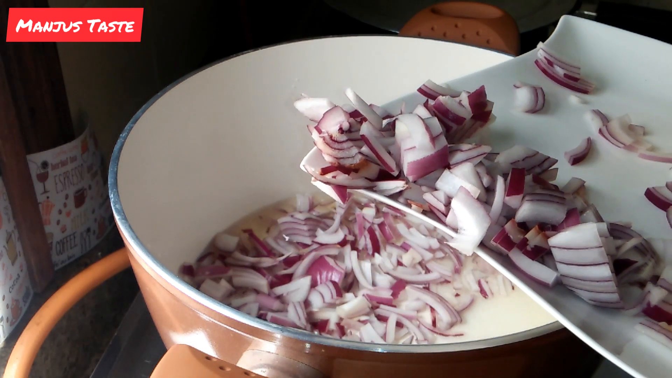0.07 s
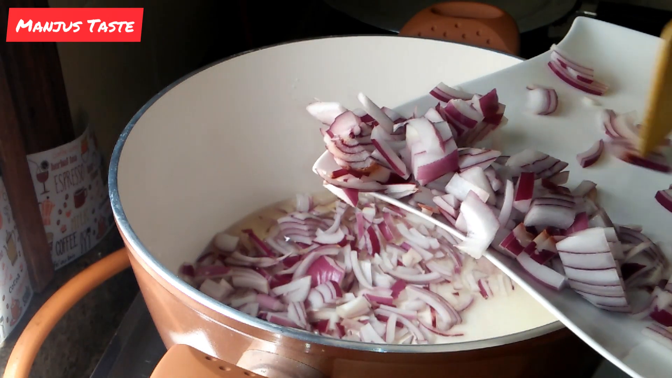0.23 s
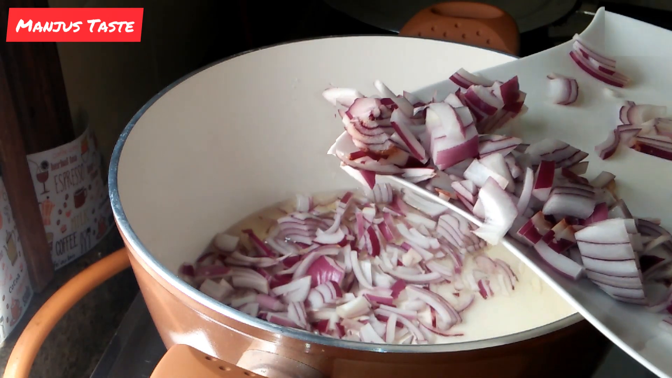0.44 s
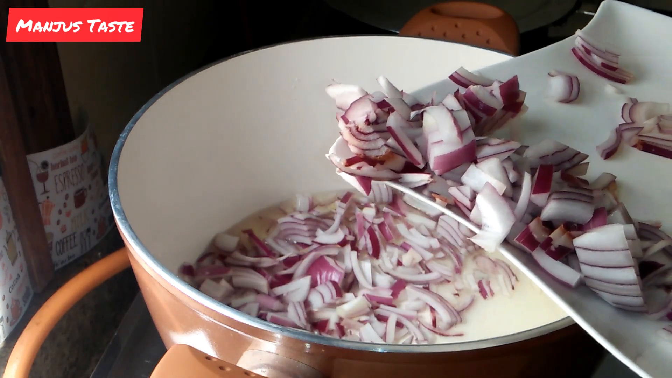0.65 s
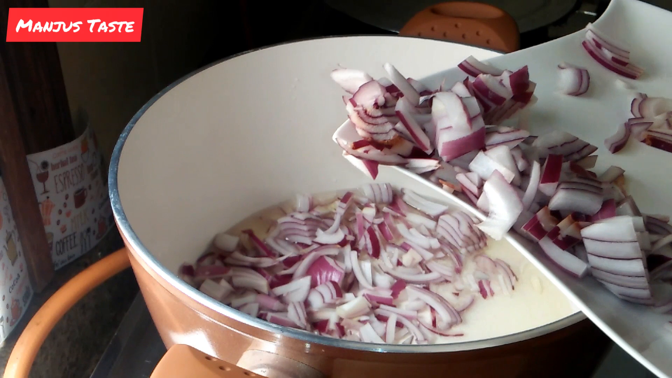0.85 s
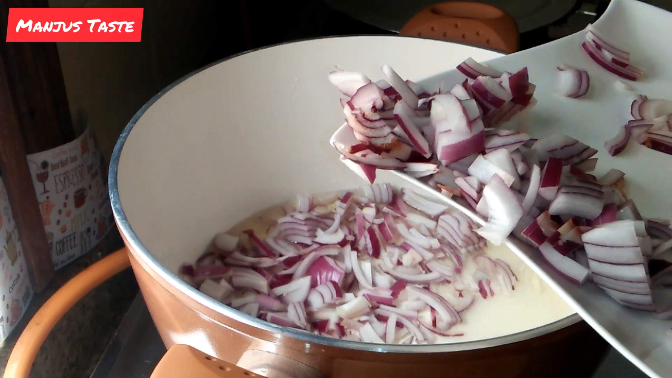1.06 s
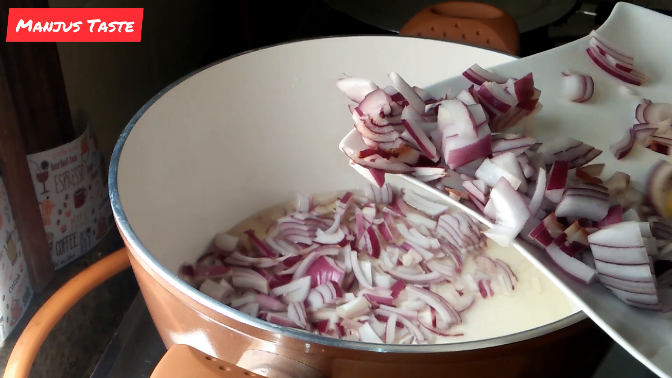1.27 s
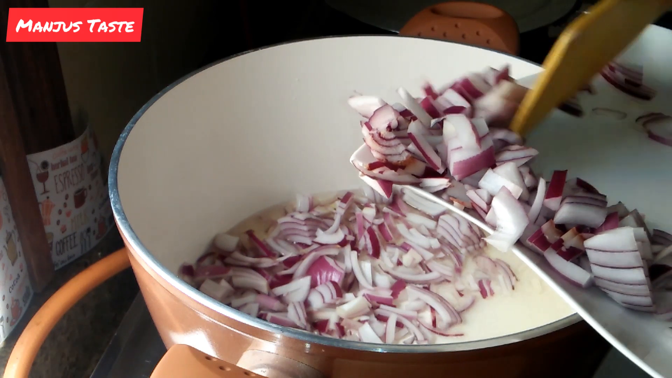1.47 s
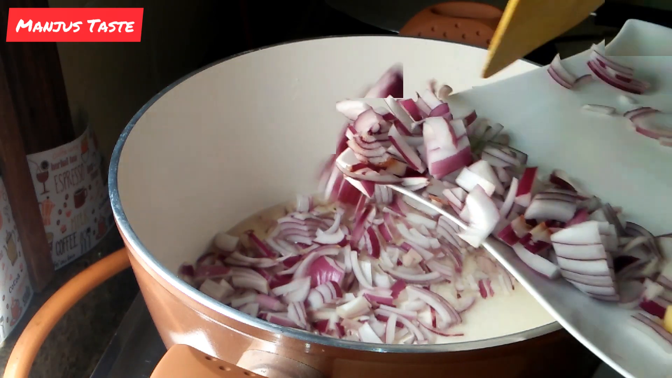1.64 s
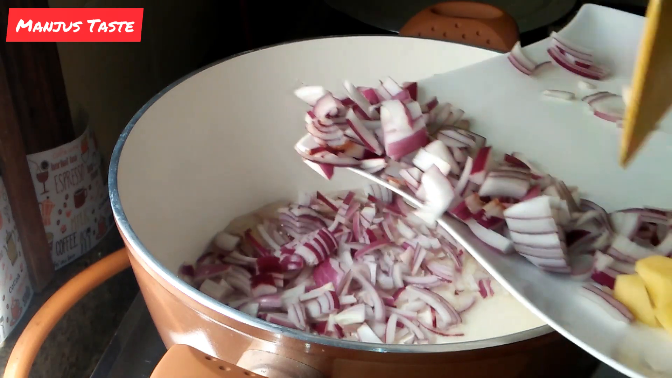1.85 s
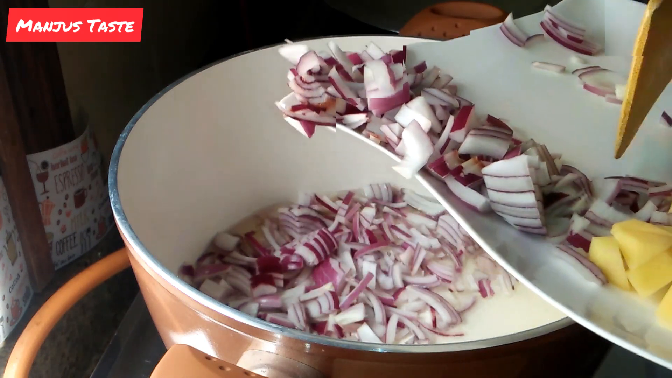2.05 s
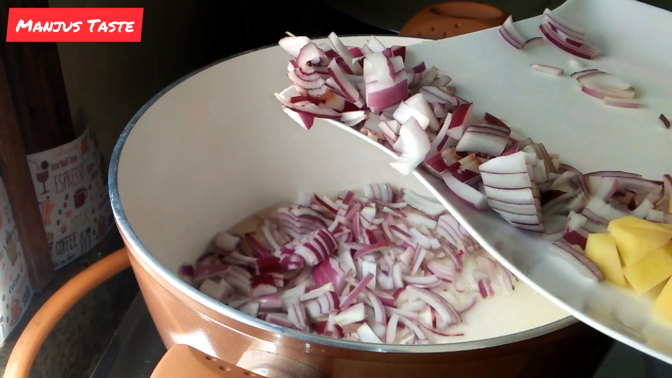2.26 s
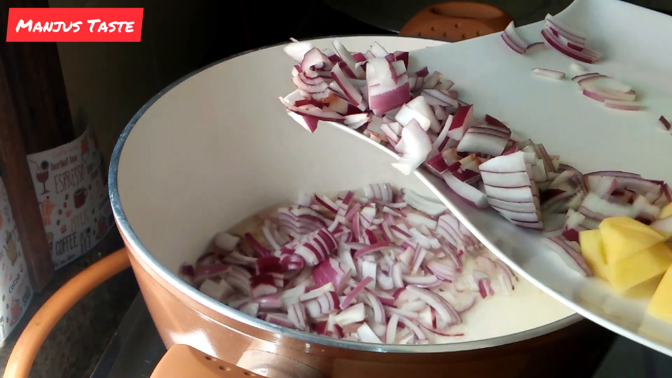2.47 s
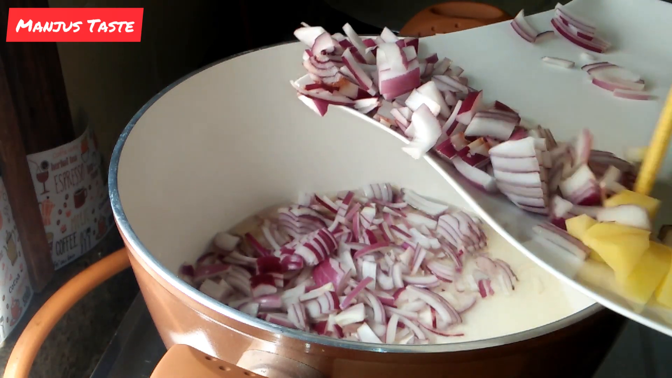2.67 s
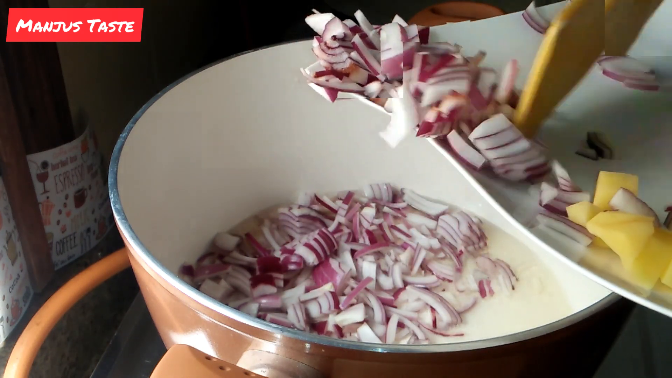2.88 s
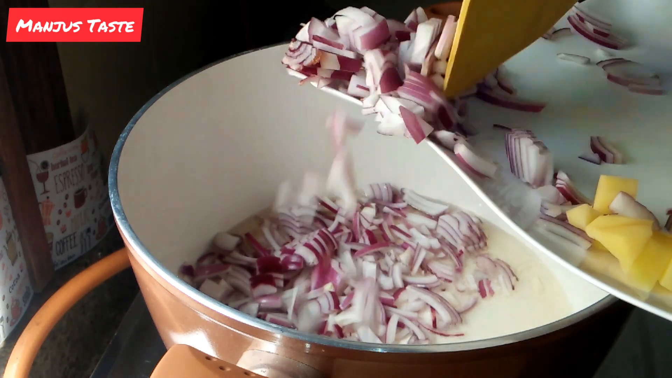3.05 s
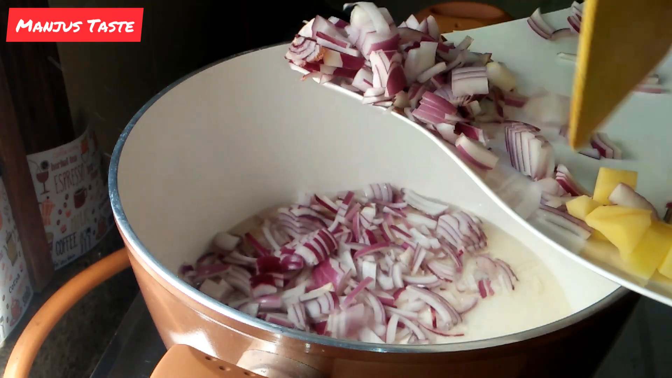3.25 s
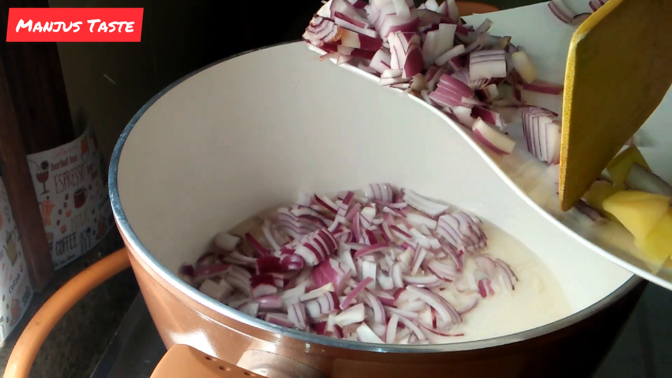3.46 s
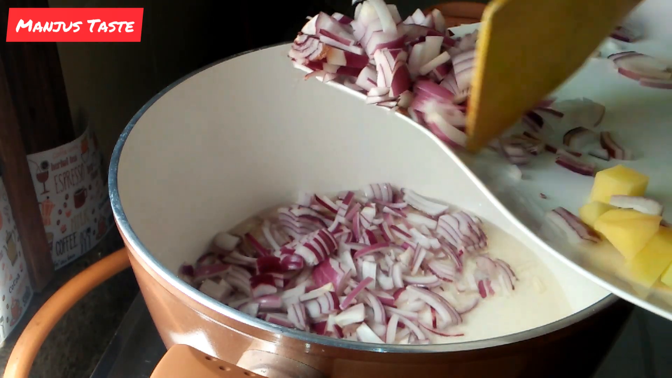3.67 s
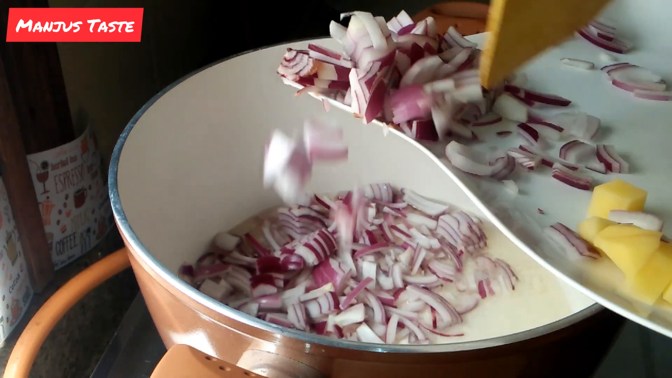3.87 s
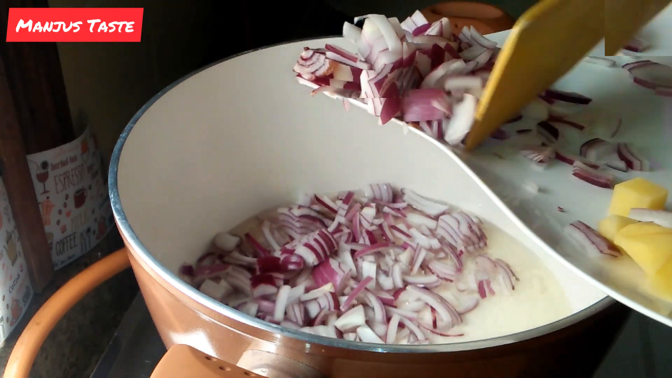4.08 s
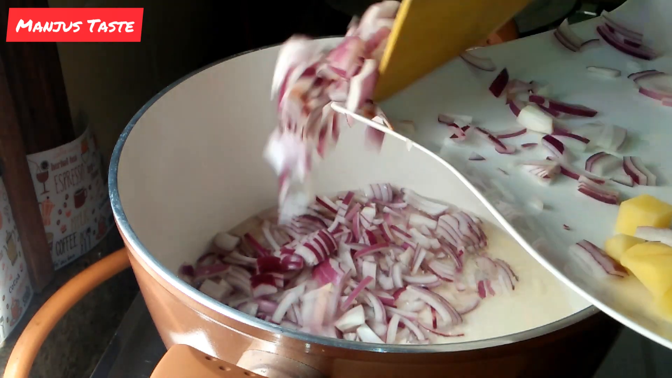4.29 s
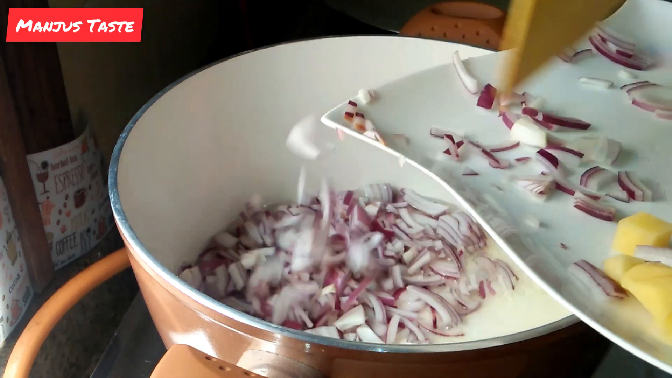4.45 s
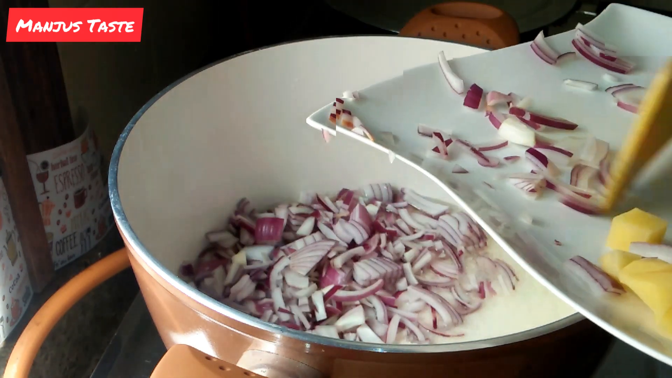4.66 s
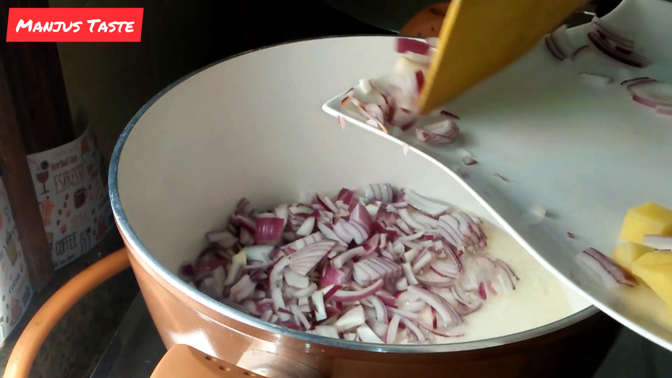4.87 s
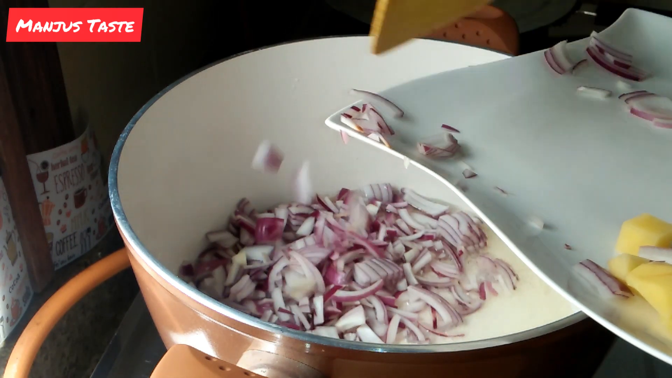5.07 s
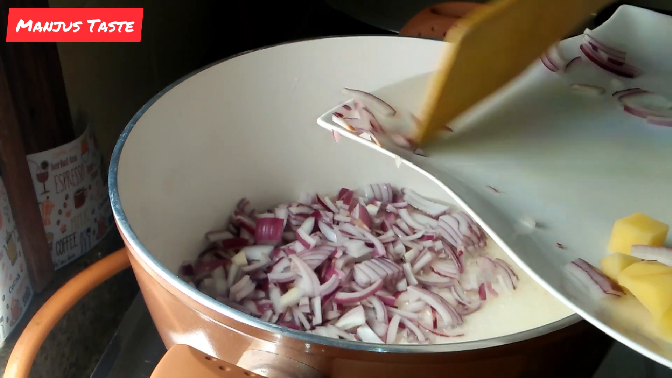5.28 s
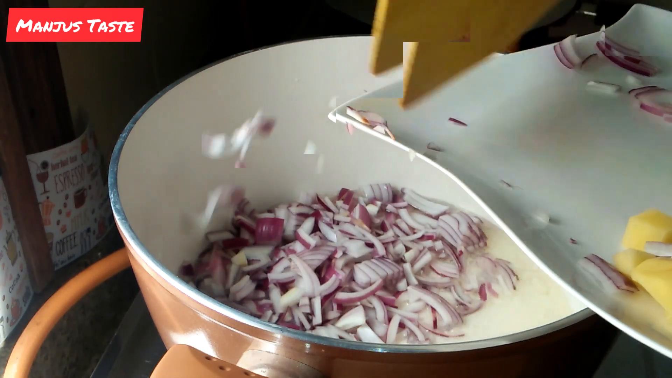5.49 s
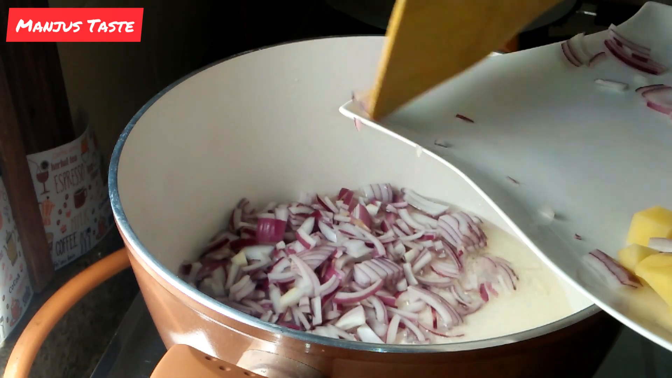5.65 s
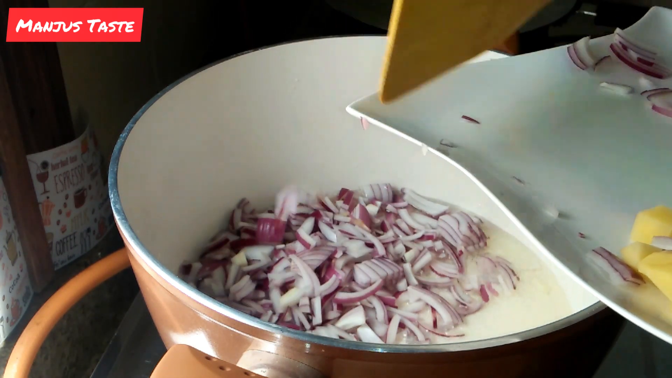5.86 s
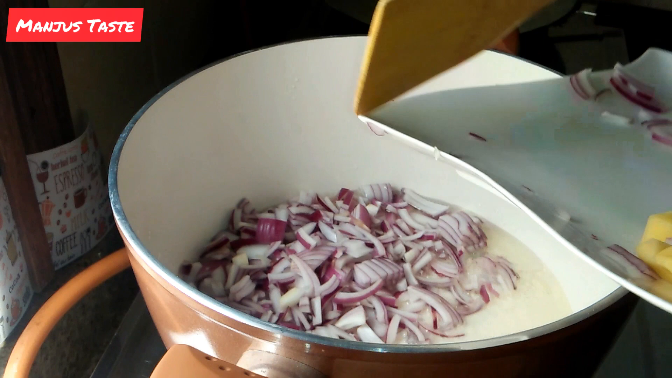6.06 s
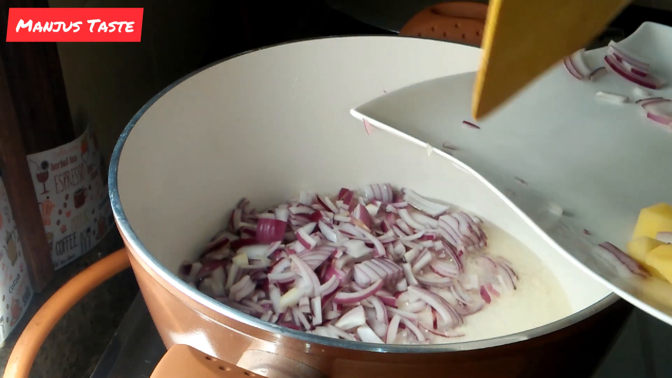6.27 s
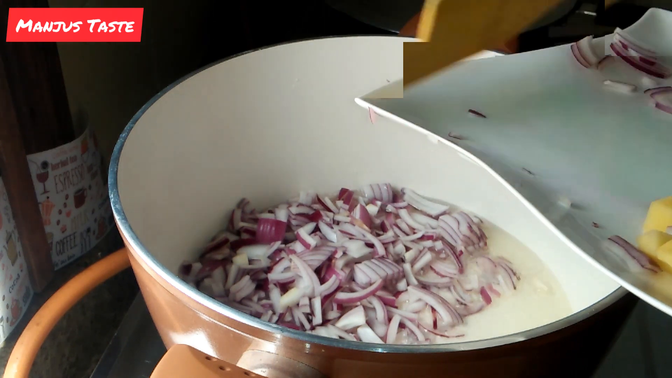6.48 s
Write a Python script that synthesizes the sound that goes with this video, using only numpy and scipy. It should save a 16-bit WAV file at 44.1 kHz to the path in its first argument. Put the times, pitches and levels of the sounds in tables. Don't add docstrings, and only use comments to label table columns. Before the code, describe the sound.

Frying oil flares and spits first, with a low flame rumble beneath. A hard wooden knock on a glazed plate follows, then a few onion pieces land softly in the pot. Lighter taps, dry scrapes and tiny bubble ticks continue until a thicker tumble of pieces and closer-spaced knocks. A close stereo microphone catches short, bright kitchen reflections; the treble fizz spreads wide while the knocks stay central.

```python
import sys
import numpy as np
from scipy import signal
from scipy.fft import rfft, irfft, next_fast_len
from scipy.io import wavfile
from scipy.ndimage import uniform_filter1d

SR = 44100
rng = np.random.default_rng(int(sys.argv[2]) if len(sys.argv) > 2 else 0)


def file_out(sig):
    cols = np.atleast_2d(sig).T
    lim = np.clip(cols, -1, 1)
    pcm = np.round(lim * 32767).astype(np.int16)
    wavfile.write(sys.argv[1], SR, pcm)


def elevation(decibels):
    levels = np.asarray(decibels, float)
    return 10 ** (levels / 20)


N = 287701


def unit(x):
    return x / np.sqrt(np.mean(x ** 2) + 1e-20)


def along(points, hz):
    f, v = np.transpose(points)
    return np.interp(np.log(hz + 1), np.log(f + 1), v)


def filtered(x, points):
    size = next_fast_len(x.shape[-1] + SR // 4)
    gain = elevation(along(points, np.fft.rfftfreq(size, 1 / SR)))
    return irfft(rfft(x, size) * gain, size)[..., :x.shape[-1]]


def rush(spectrum, patchy_db, bins, frames):
    z = signal.stft(rng.standard_normal((2, N)), nperseg=512)[2]
    field = uniform_filter1d(rng.standard_normal(z.shape[1:]), bins, 0)
    field = uniform_filter1d(field, frames, 1)
    noise = signal.istft(z * elevation(patchy_db * unit(field)), nperseg=512)[1][:, :N]
    return unit(filtered(noise, spectrum))


def crackle(spectrum, share, size_db, bins, fade_s):
    z = signal.stft(rng.standard_normal((2, N)), nperseg=256)[2]
    pops = (rng.random(z.shape[1:]) < share) * elevation(size_db * rng.exponential(size=z.shape[1:]))
    pops = bins * uniform_filter1d(pops, bins, 0)
    gain = 1 + signal.lfilter([1], [1, -np.exp(-128 / (fade_s * SR))], pops, axis=1)
    noise = signal.istft(z * gain, nperseg=256)[1][:, :N]
    return unit(filtered(noise, spectrum))


def swells(starts, holds, peak_db, rest_db, attack_s, release_db_per_s):
    knots = np.arange(0, N, 64)
    t = knots / SR - np.array(starts)[:, None]
    after_hold = np.clip(t - np.array(holds)[:, None], 0, None)
    shape = np.clip(t / attack_s, 0, 1) * elevation(-release_db_per_s * after_hold)
    power = elevation(2 * rest_db) + (elevation(peak_db) ** 2) @ shape ** 2
    return np.interp(np.arange(N), knots, np.sqrt(power))


def ring(hz, db, t60, rise):
    t = np.arange(SR // 8) / SR
    return elevation(db - 60 * t / t60) * (1 - np.exp(-t * hz / rise)) ** 2 * np.sin(2 * np.pi * hz * t)


# freq_hz, t60_s
KITCHEN = [(300, 0.51), (900, 0.34), (1400, 0.37), (2000, 0.39), (2800, 0.37), (5000, 0.27), (9000, 0.35),
           (14000, 0.15)]
# freq_hz, gain_db
BAND_EDGE = [(14240, 0), (14300, -40), (14500, -65)]


def kitchen_tail():
    clumps_db, clump_s = 1.2, 0.005
    near_gap, gap_s = 0.31, 0.011
    hz, t, z = signal.stft(rng.standard_normal((2, 3 * SR // 8)), SR, nperseg=256)
    decay_db = along(BAND_EDGE, hz + 60)[:, None] - 60 * t / along(KITCHEN, hz)[:, None]
    tail = signal.istft(z * elevation(decay_db), SR, nperseg=256)[1]
    late = np.arange(tail.shape[1]) / SR
    tail = tail * np.clip(late / 0.00064, 0, 1)
    tail = tail * (1 + 0.85 * np.exp(-((late - 0.039) / 0.003) ** 2))
    clumps = np.interp(late / clump_s, np.arange(200), rng.standard_normal(200))
    return tail * elevation(clumps_db * clumps) * (1 - near_gap * np.exp(-late / gap_s))


def add(out, s, sound, room_db, side_db):
    tail = kitchen_tail()
    wet = elevation(room_db) * signal.fftconvolve(sound[None], tail / np.linalg.norm(tail[0]), axes=1)
    wet[:, :len(sound)] += sound * [[1], [elevation(side_db)]]
    seat = out[:, round(s * SR):][:, :wet.shape[1]]
    seat += wet[:, :seat.shape[1]]


# freq_hz, density_db_per_hz
HOB = [(22, -21.5), (30, -18.5), (48, -16), (64, 3.5), (85, -11.5), (106, 1), (125, -14), (155, -19),
       (190, -13.5), (240, -43)]
# start_s, hold_s, level_db
GUSTS = [(-.03, 0.73, -70), (0.354, 0.57, -62), (0.75, 0.11, -55), (0.936, 0.044, -52), (1.295, 0.081, -59),
         (1.51, 0.33, -59), (1.959, 0.31, -55.5), (2.258, 0.14, -54.5), (2.573, 0.19, -55),
         (2.89, 0.083, -58), (3.29, 0.064, -55), (3.658, 0.068, -56.5), (3.955, 0.22, -63),
         (4.38, 0.045, -58), (4.495, 0.29, -62), (4.834, 0.079, -61), (5.02, 0.039, -61),
         (5.13, 0.14, -59.5), (5.503, 0.049, -59.5), (5.695, 0.18, -58.5), (5.964, 0.029, -52),
         (6.108, 0.066, -66)]


def burner():
    gain = swells(*np.transpose(GUSTS), rest_db=-66.5, attack_s=0.035, release_db_per_s=118)
    return gain * rush(HOB, patchy_db=2.5, bins=1, frames=4)


# freq_hz, density_db_per_hz
RUSTLE = [(900, -41.5), (1200, -2), (1700, -1.5), (2300, -4.5), (3200, -10.5), (4500, -21.5), (7000, -36.5)]
# freq_hz, density_db_per_hz
MURK = [(120, -23.5), (200, -14), (328, -3.5), (371, -16), (398, -6), (477, -1), (524, -20), (571, -1.5),
        (679, -11), (763, -1.5), (1140, -6), (1230, -12.5), (1300, -15.5), (1690, -54), (2860, -120)]
# start_s, hold_s, rustle_db, shove_over_rustle_db
DRAGS = [(-.03, 0.037, -62, -24), (0.384, 0.13, -80.5, 17), (1.333, 0.016, -65, 17.5),
         (1.483, 0.046, -56.5, -10), (1.67, 0.12, -71.5, 3), (2.451, 0.027, -66.5, 4),
         (2.706, 0.21, -67.5, 4), (2.965, 0.036, -69.5, 6.5), (3.263, 0.32, -67, 1), (4.178, 0.062, -67, 7),
         (4.52, 0.133, -61.5, 4.5), (4.751, 0.035, -59.5, -1), (4.837, 0.027, -61, -24),
         (5.082, 0.16, -69, -6), (5.925, 0.083, -66, 4.5), (6.107, 0.038, -48.5, -23)]


def drags():
    start, hold, rustle_db, over_db = np.transpose(DRAGS)
    attack_s, release_db_per_s = 0.0088, 133.5
    rustle = swells(start, hold, rustle_db, -71.5, attack_s, release_db_per_s)
    shove = swells(start, hold, rustle_db + over_db, -66.5, attack_s, release_db_per_s)
    out = rustle * rush(RUSTLE, patchy_db=4.0, bins=2, frames=8)
    return out + shove * rush(MURK, patchy_db=4.5, bins=1, frames=27)


# freq_hz, density_db_per_hz
FINE = [(2940, -50), (5000, -21), (5580, -10), (6950, -4.5), (8290, 1.5), (10100, 1), (11600, -1),
        (13700, -2), (14300, -13)]
# freq_hz, density_db_per_hz
COARSE = [(1060, -59), (1800, -29), (2030, -14.5), (2360, -22), (2760, -8), (4010, -4.5), (7000, -2.5),
          (9100, -23.5), (15400, -120)]
# start_s, hold_s, fine_db, coarse_below_fine_db
FLARES = [(-.05, 0.089, -48.5, 4), (0.102, 0.28, -53.5, 2), (0.667, 0.2, -60, 19), (1.047, 0.38, -61.5, 14),
          (1.655, .05, -67, 10), (1.702, 0.121, -58, 11.5), (2.007, 0.25, -57.5, 13.5),
          (2.4, 0.068, -64.5, 8), (2.873, 0.19, -58, 44), (3.267, 0.061, -60, 21), (3.347, 0.14, -59, 19.5),
          (3.741, 0.16, -66, 10), (4.006, 0.25, -61.5, 9), (4.483, 0.5, -58.5, 9.5),
          (5.162, 0.072, -65.5, 11), (5.314, 0.019, -58.5, 9), (5.832, 0.052, -70, 18),
          (5.947, 0.038, -66, -7.5), (6.11, 0.13, -59.5, 13), (6.414, 0.13, -60, 19.5)]


def frying():
    start, hold, fine_db, under_db = np.transpose(FLARES)
    attack_s, sink_db_per_s = 0.018, 47.5
    fine = swells(start, hold, fine_db, -82, attack_s, sink_db_per_s)
    coarse = swells(start, hold, fine_db - under_db, -81.5, attack_s, sink_db_per_s)
    oil = fine * crackle(FINE, share=0.0041, size_db=2.0, bins=15, fade_s=0.0091)
    oil += coarse * crackle(COARSE, share=0.0011, size_db=1.5, bins=7, fade_s=0.024)
    return filtered(oil, BAND_EDGE)


# pitch_hz, level_db, t60_s
POT = [(469, -5, 0.097), (594, -8, 0.12), (1003, 6, 0.049), (899, -16, 0.2), (1330, -1.5, 0.032),
       (1646, -3, 0.028), (2054, -10.5, 0.038)]
# start_s, level_db, low_hum_db
DROPS = [(1.8722, -44.5, -47), (1.878, -48.5, -36.5), (1.899, -61, -40), (2.191, -67, -58),
         (2.348, -58, -79.5), (2.516, -59, -83), (3.218, -56, -58), (3.256, -61, -49.5), (3.297, -67, -66),
         (3.424, -72, -52), (4.131, -59, -41.5), (4.17, -75, -49), (4.47, -56, -61), (4.479, -54, -61),
         (4.498, -62, -41), (4.507, -47, -56), (4.524, -62, -52), (4.551, -72, -45), (4.582, -48, -42.5),
         (4.6, -48.5, -64), (4.634, -54, -44.5), (4.651, -73, -82), (4.663, -75, -58), (4.699, -62, -48),
         (5.272, -63, -48.5), (5.332, -74, -56)]


def drops():
    out = np.zeros((2, N))
    for s, db, hum_db in DROPS:
        wall = 0
        for hz, mode_db, t60 in POT:
            landing_db = hum_db if hz < 700 else db
            wall = wall + ring(hz, landing_db + mode_db + 0.5 + rng.normal(0, 0.43), t60, rise=1.9)
        add(out, s, wall, room_db=-1.0, side_db=-6)
    return out


# start_s, level_db, centre_hz, length_cycles
SPITS = [(0.11, -27, 5460, 1.5), (0.2464, -56, 12400, 2), (0.676, -36, 8270, 3.9), (0.702, -35, 7850, 4.2),
         (1.039, -36, 8000, 1.1), (1.1003, -56, 13300, 2), (1.1647, -55, 9700, 3.9),
         (1.2526, -71, 8140, 1.8), (1.349, -29.5, 10500, 3.4), (1.685, -41, 3270, 1.2),
         (1.7238, -21, 9900, 2.9), (1.7264, -28, 10500, 2.1), (1.733, -39, 11000, 2.3),
         (1.8706, -38.5, 7800, 4), (2.0218, -41, 12540, 1.8), (2.062, -31, 12000, 8),
         (2.4994, -35, 12800, 1.8), (2.733, -34, 8800, 2.8), (2.8645, -25, 11600, 4),
         (3.0015, -30.5, 7340, 4), (3.008, -39, 6950, 3.1), (3.016, -46, 7500, 3.3),
         (3.26, -36.5, 8400, 1.2), (3.705, -48, 7900, 8.6), (3.8304, -31, 9140, 5.1),
         (4.0148, -54.5, 11400, 2), (4.483, -42, 8700, 5.8), (4.9581, -38, 7900, 5.8),
         (5.163, -35, 13000, 5.5), (5.3142, -42, 7100, 7.8), (5.8243, -42, 9300, 4),
         (6.1157, -20.5, 9000, 1.1), (6.118, -20, 7040, 1.53), (6.4097, -35.5, 9450, 5.2)]
# start_s, level_db, pitch_hz, length_cycles
BUBBLES = [(2.043, -34, 5800, 4.7), (2.2337, -49, 3950, 21), (2.236, -50, 4900, 14),
           (2.38, -42.5, 6350, 11.5), (2.52, -60, 4170, 18), (2.584, -47, 6130, 11), (2.707, -56, 6100, 22),
           (2.915, -41.5, 4880, 11), (2.9244, -41, 6450, 22), (3.101, -39, 4560, 4.6),
           (3.1478, -47, 4800, 12), (4.2586, -33.5, 6400, 4.9), (4.51, -62, 4330, 27),
           (5.184, -42.5, 5860, 16), (6.13, -49, 6900, 15), (6.137, -56, 8000, 13),
           (6.216, -35, 6260, 13.4),
           (1.801, -37, 8220, 12), (2.1494, -44, 9900, 15), (2.188, -43.5, 8600, 15),
                (2.338, -40, 7400, 8.4), (3.001, -38, 7000, 11.8), (3.3774, -47, 8350, 14),
                (4.0617, -58, 10600, 12), (4.154, -40.5, 8470, 14), (4.211, -31, 8000, 4.4),
           (0.401, -52, 1240, 9.3), (1.058, -58, 766, 9.5), (1.682, -66, 1410, 5.2),
               (3.49, -44, 1880, 6.7), (3.92, -56, 1940, 8.8), (4.0306, -38.5, 2800, 7.2),
           (4.752, -38, 1900, 8.7),
    (5.951, -50, 1820, 3.7),
]


def spits():
    out = np.zeros((2, N))
    for s, db, hz, cycles in SPITS:
        spit = ring(hz, db + 13.0, 1.6 * cycles / hz, rise=0.29 * cycles)
        add(out, s, spit, room_db=6.5, side_db=-10.5)
    for s, db, hz, cycles in BUBBLES:
        add(out, s, ring(hz, db, 4.0 * cycles / hz, rise=1.12), room_db=3.5, side_db=-20)
    return out


# freq_hz, density_db_per_hz
SPRAY = [(710, -24), (1200, -9), (1910, -5), (2190, -13), (3560, -7), (4810, -6), (5990, -4), (12500, 1.5),
         (14300, -13)]
# start_s, level_db
BURSTS = [
    (5.9462, -36.5),
    (5.9482, -30.5),
    (5.9502, -27),
    (5.9522, -32.5),
    (5.9552, -31),
    (5.9572, -30.5),
    (5.9595, -34),
]


def sputter():
    out = np.zeros((2, N))
    size = round(0.0024 * SR)
    for s, db in BURSTS:
        grains = rng.standard_normal(size) * elevation(2.8 * rng.standard_normal(size))
        grains = grains * signal.windows.tukey(size, 0.6)
        spray = filtered(np.pad(unit(grains), SR // 100), SPRAY)
        add(out, s - 0.01, elevation(db) * spray, room_db=-0.5, side_db=-9.5)
    t = np.arange(N) / SR - BURSTS[1][0]
    hiss = (t > 0) * elevation(-46 - 60 * np.abs(t) / 0.44)
    return out + hiss * rush(SPRAY, patchy_db=0.0, bins=9, frames=3)


def scuff(db, dull_db_per_khz):
    t = np.arange(SR // 8) / SR
    low_hz, t60 = 1300, 0.0048
    burst = elevation(db - 60 * t / t60) * (1 - np.exp(-t / 0.0008)) * rng.standard_normal(len(t))
    dulling = [(1000 * khz, -dull_db_per_khz * (khz - 1.5)) for khz in (2, 3, 4, 6, 8, 12)]
    return filtered(burst, [(0.55 * low_hz, -40), (low_hz, 0)] + dulling)


def blade(hz, db, second_db, twin, twin_db, swell, t60):
    wood = ring(hz, db + 9.5, t60, rise=swell)
    wood += ring(twin * hz, db + twin_db, t60, rise=swell)
    wood += ring(1570, db + second_db + 6.5, 0.012, rise=4.5)
    return signal.sosfilt(signal.butter(6, 0.86 * hz, "high", fs=SR, output="sos"), wood)


# pitch_hz, level_db, t60_s
PLATE = [
    [(1940, 2.5, 0.02), (2133, -5.5, 0.034), (2327, -6, 0.011)],
    [(2796, 8.5, 0.069)],
    [(3314, -8, 0.033), (3416, -4, 0.0237), (3750, -6, 0.017), (4227, -9.5, 0.019)],
    [(4380, 1.5, 0.029), (4820, 3.5, 0.012)],
    [(5794, 6, 0.018), (7300, 4, 0.0074), (7570, 0, 0.011)],
]


def reach_db(hz, plate_db, soft):
    khz = (hz - PLATE[0][0][0]) / 1000
    return plate_db - (4 + soft * khz) * khz


def plate(plate_db, soft, bell_db, spot):
    modes = [(family[0][0], *mode) for family in PLATE[:1] + PLATE[2:] for mode in family]
    (bell_hz, bell_gain_db, bell_t60), = PLATE[1]
    glaze = ring(bell_hz, bell_db + bell_gain_db, bell_t60, rise=2.1)
    for (family_hz, hz, db, t60), spot_db in zip(modes, spot):
        glaze += ring(hz, reach_db(family_hz, plate_db, soft) + db + spot_db + 5, t60, rise=2.7)
    return glaze


# start_s, level_db, blade_pitch_hz, low_plate_mode_db, thud_db
TAPS = [
    (1.3465, -1.5, 1312, -5, -55.5),
    (2.6312, -12.5, 1323, -29, -62),
    (3.6946, -22, 1144, -3.5, -16),
    (4.1875, -21.5, 1117, 3, -12),
    (4.7692, -4.5, 1310, -22, -36),
    (5.0038, -15.5, 1326, 5, -21),
    (5.3734, -18.5, 1050, 7.5, -16),
    (5.7177, -15.5, 1193, -2, -17),
    (6.117, -12.5, 1170, 2, -18.5),
    (6.5181, 2.5, 1250, 0.5, -28.5),
]
# plate_db, softness_db_per_khz2, rim_bell_db, crack_db, first_touch_db
CONTACTS = [(-19, 0.18, -29, -24.5, -58.5), (-34.5, 3.5, -55, -39, -38), (-43, 23, -89, -72, -50),
            (-47.5, 2, -56, -48, -62), (-18.5, 0.87, -38, -22.5, -39), (-27, 2, -54, -50, -35),
            (-24, 1.48, -32.5, -30.5, -36.5), (-36.5, 9.5, -83, -64, -37.5), (-24.5, .5, -55, -42, -38),
            (-29.5, -.5, -41, -50, -27.5)]
SPOT_LOW = [(-0.5, -2, 0.5, 3, -2), (0.5, -1, 13.5, 2, 4.5), (-1, -6, -1, -3, -.5), (-2, 2.5, 2, -10, -6),
            (0.5, -5, 10, -5, 4.5), (-0.5, 1.5, 4, 6.5, -15), (-4.5, -2, -8, 1, -7), (4, -11, -3, -8, 5),
            (3, -1.5, 4, 1.5, -2), (2.5, 3.5, 4, -6, 3)]
SPOT_HIGH = [(-5.5, -11.5, -3.5, 2, -0.5), (-11, -13, -1, -10, -.5), (-4, -8, .5, -3, -.5),
             (2, -2, 5, 5, 3), (3, 2, -5.5, 2.5, 6), (-1.5, -10, 1.5, -12, -6), (-2, 5.5, -8, 3, 12.5),
             (-.5, 3, 10, 5, 3), (-1, -3, 0, 0.5, -2), (10.5, 6, 2, -1.5, -1.5)]
# twin_over_pitch, twin_db, swell_cycles, t60_s, first_touch_hz
GRIPS = [(1.11, 7, 1.95, 0.01, 680), (1.163, 2, 2.27, 0.012, 950), (1.06, 6.5, 2.6, 0.0095, 820),
         (1.085, 12, 3.3, 0.016, 1100), (1.12, -3, 2.4, 0.016, 690), (1.1, 5, 1.88, 0.0092, 1100),
         (1.09, 3, 2.1, 0.025, 610), (1.075, -1, 2.2, 0.0095, 740), (1.095, 8.5, 2.1, 0.011, 730),
         (1.109, 2.5, 2.43, 0.017, 970)]
# level_db, dulling_db_per_khz
SCUFFS = [(-23, 4), (-40, 9), (-50, 14), (-48, 12), (-17, 10), (-40, 7), (-34, 5), (-42, 14), (-29, 0),
          (-29, 4)]
# gap_s, corner_db, flat_db, room_db
LANDINGS = [(0.002484, -10.5, -1.5, -2), (0.00207, -0.5, -18, -0.5), (0.00309, -13, -0.5, -1.5),
            (0.00195, -15, -1, -3), (0.001174, -3.5, 1.5, -2), (0.00147, 0, -7.5, -2),
            (.0015, -3, -3, -0.5), (0.00096, 1.5, -14, -1.5), (0.00219, -10.5, 1, -2),
            (0.00113, -8, -2.5, 3)]


def taps():
    out = np.zeros((2, N))
    bell_hz = PLATE[1][0][0]
    for tap, contact, low, high, grip, rub, landing in zip(
            TAPS, CONTACTS, SPOT_LOW, SPOT_HIGH, GRIPS, SCUFFS, LANDINGS):
        s, db, hz, second_db, thud_db = tap
        plate_db, soft, bell_db, crack_db, touch_db = contact
        twin, twin_db, swell, t60, touch_hz = grip
        gap, corner_db, flat_db, room_db = landing
        wood = blade(hz, db, second_db, twin, twin_db, swell, t60)
        wood += ring(893, db + thud_db + 13.0, 0.012, rise=0.92)
        wood += ring(637, db + thud_db, 0.021, rise=1.0)
        wood = elevation(corner_db) * wood + elevation(flat_db) * np.roll(wood, round(gap * SR))
        glaze = plate(plate_db, soft, bell_db, [*low, *high, high[-1], high[-1]])
        crack = ring(2498, crack_db + 17.5, 0.0076, rise=2.9)
        crack += ring(5300, reach_db(5300, plate_db, soft) - 8, 0.00086, rise=0.6)
        add(out, s - 0.0004, wood + glaze + crack + scuff(*rub), room_db=room_db, side_db=-14.0)
        first_touch = ring(touch_hz, touch_db + 5, 0.008, rise=0.49)
        add(out, s - 0.007, first_touch, room_db=6.5, side_db=-11.5)
        seat = out[0, round((s - 0.0004) * SR):][:SR // 8]
        seat += ring(bell_hz, bell_db - 4, 0.15, rise=7.3)[:len(seat)]
    return out


# freq_hz, side_over_mid_db
WIDTH = [(60, -55), (110, -41), (200, -41.5), (380, -36), (690, -60), (1280, -44), (2350, -53),
         (4330, -17.5), (7980, -5), (14700, -4.5)]


def scene():
    mid, side = burner() + drags() + frying() + drops() + spits() + sputter() + taps()
    side = filtered(side, WIDTH)
    return np.array([mid + side, mid - side])


def low_pass(x):
    return signal.sosfilt(signal.butter(12, 15310, fs=SR, output="sos"), x)


def record(dry):
    mix = filtered(dry, [(14300, -0.5), (14500, -21)])
    return low_pass(mix)


dry = scene()
out = record(dry)
file_out(out)
```